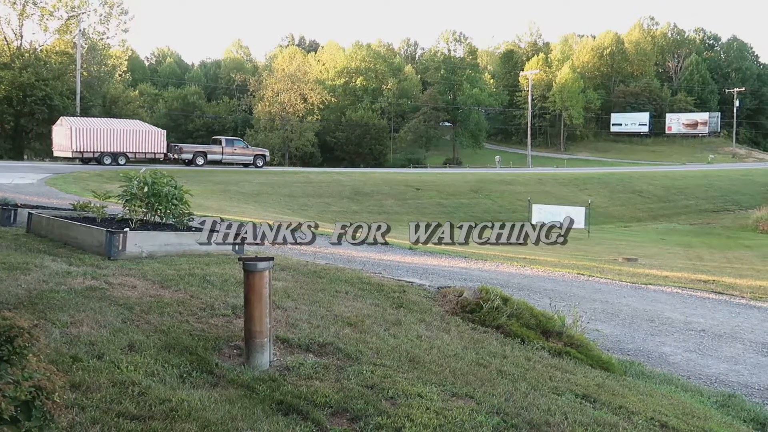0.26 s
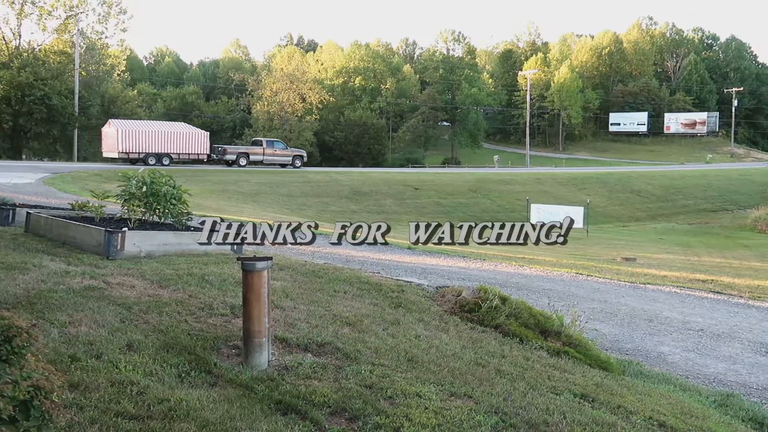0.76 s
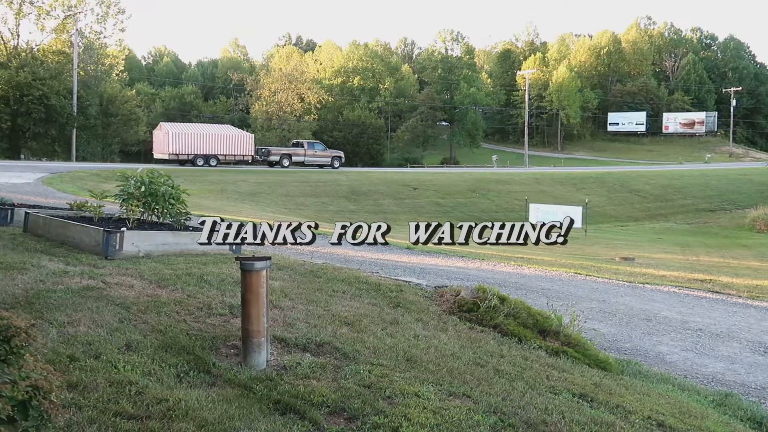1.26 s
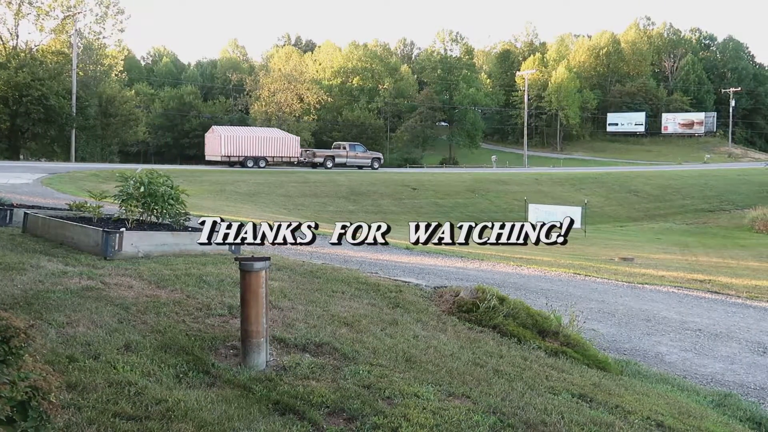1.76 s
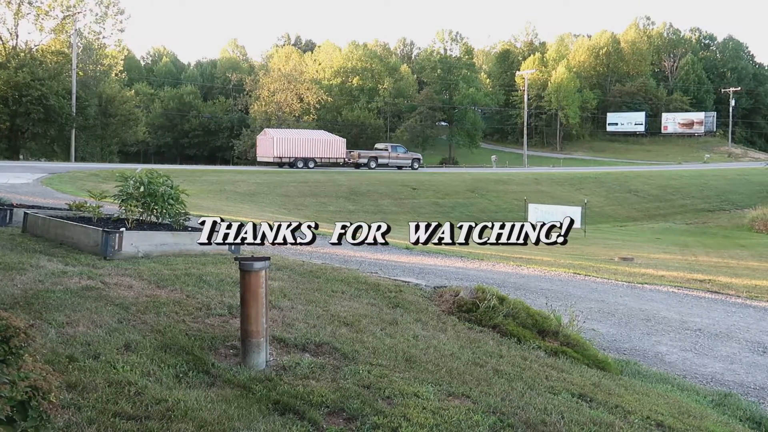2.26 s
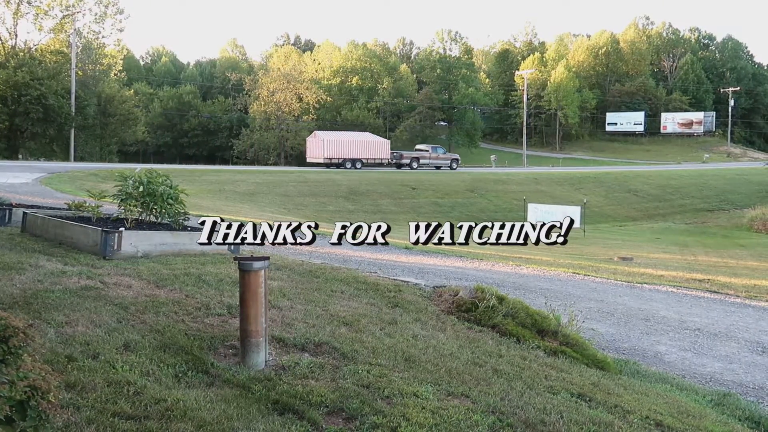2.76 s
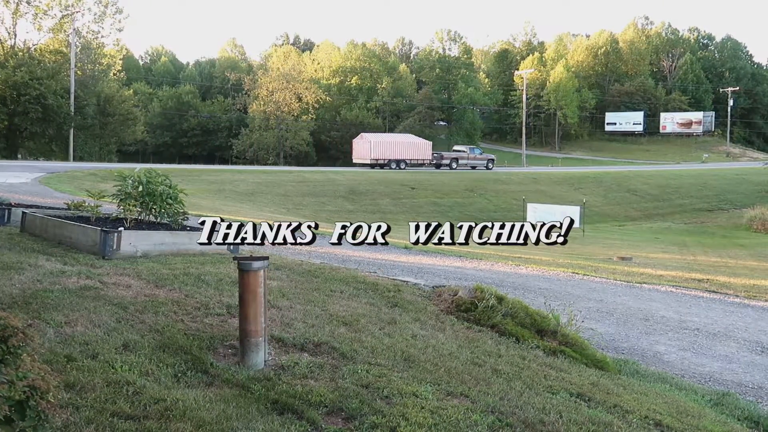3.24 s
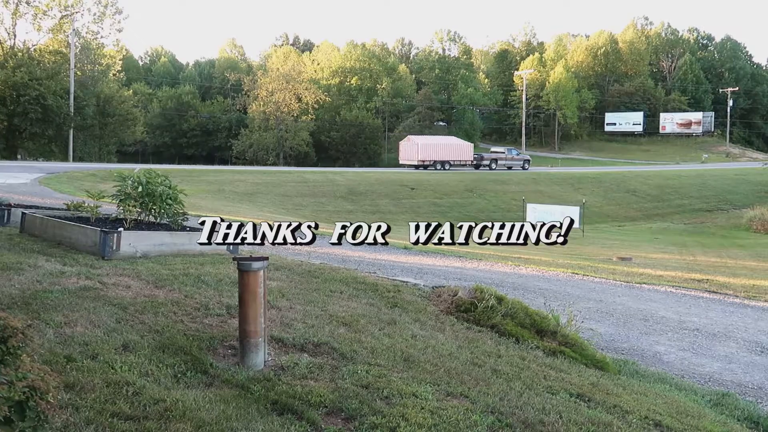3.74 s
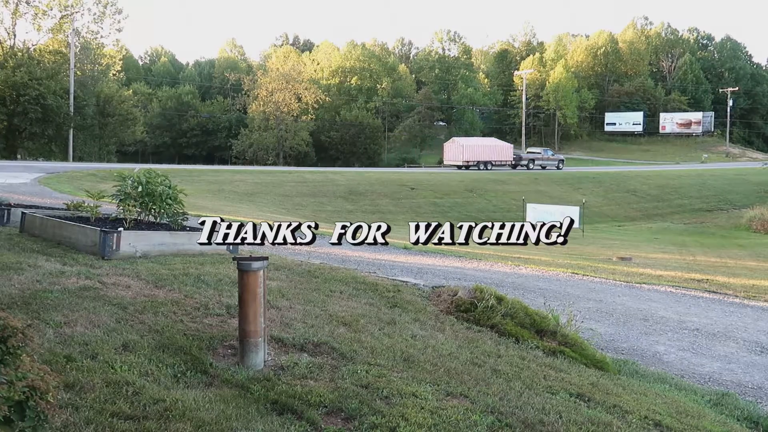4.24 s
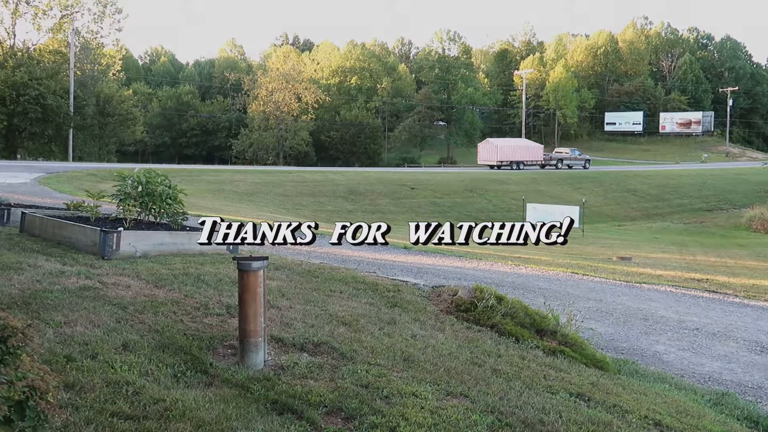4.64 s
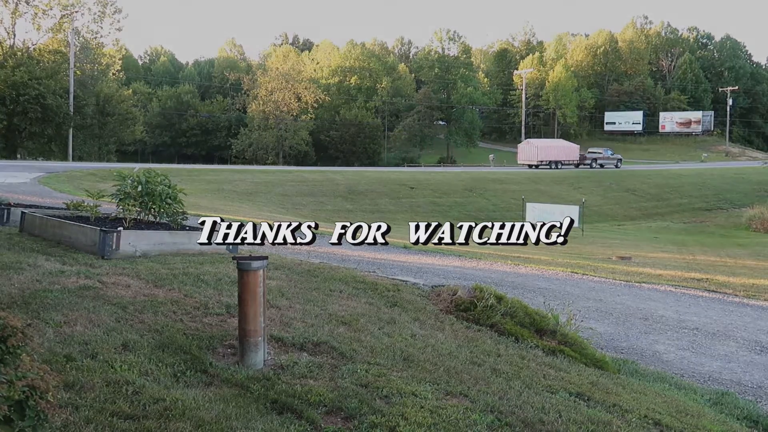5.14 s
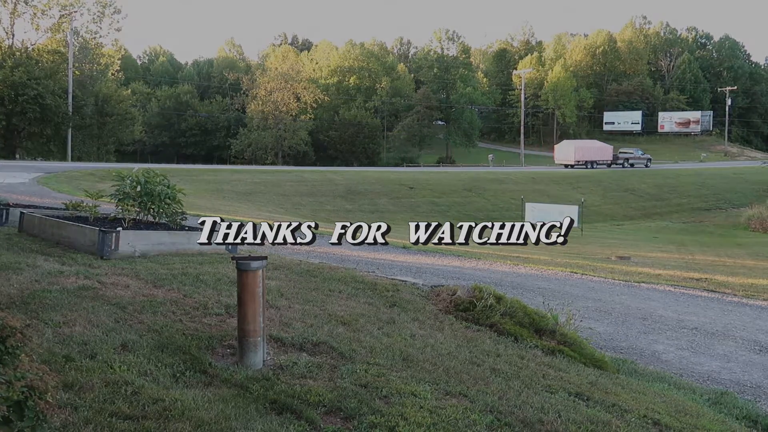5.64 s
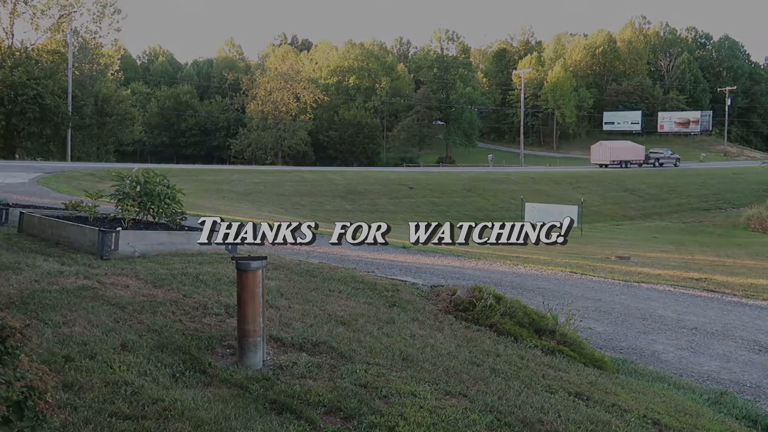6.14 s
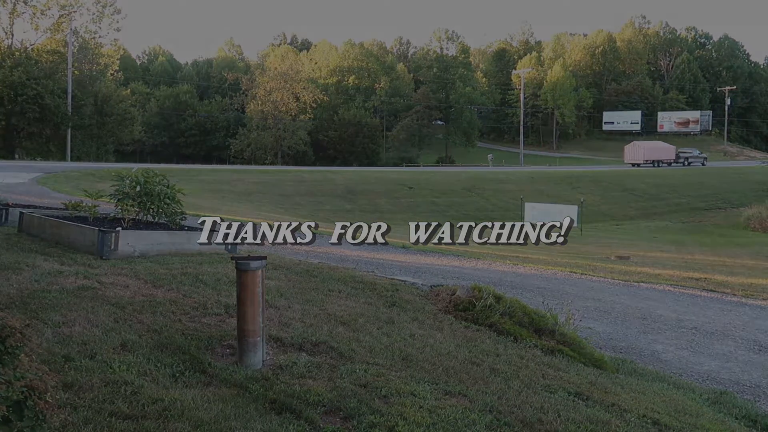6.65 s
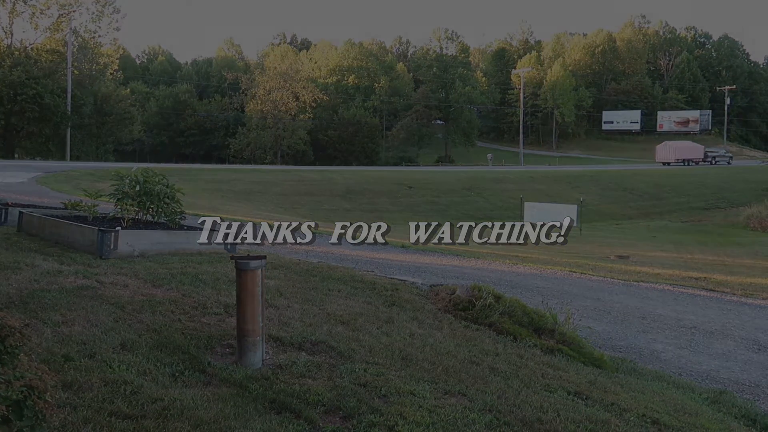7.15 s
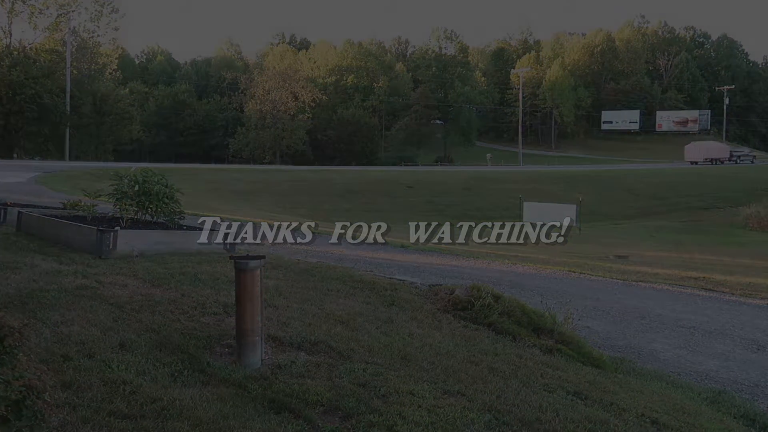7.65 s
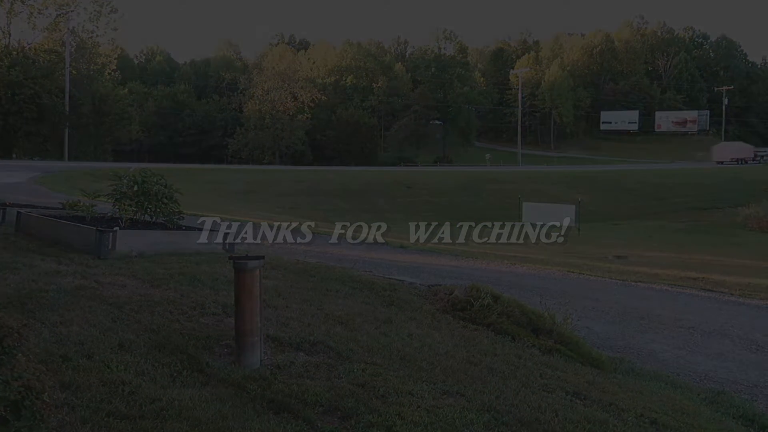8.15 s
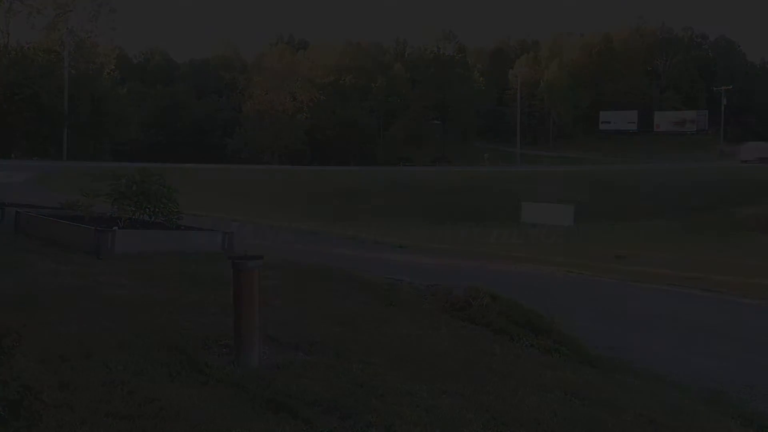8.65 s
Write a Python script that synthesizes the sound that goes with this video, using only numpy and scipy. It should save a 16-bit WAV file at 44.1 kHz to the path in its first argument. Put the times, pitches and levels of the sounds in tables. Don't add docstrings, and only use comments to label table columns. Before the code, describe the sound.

A diesel pickup towing a trailer is already pulling along a country road, heard from a grassy yard by a fixed stereo microphone. From 0 to 3 seconds its deep, even exhaust boom, around 80 hertz, climbs slightly, with a coarse, hollow knocking rattle and wavering pipe tones above and tyre and trailer rumble below. Around 3 seconds it shifts gear: the pitch drops quickly, holds low until about 4, climbs again by 5, then creeps up slowly. The boom flutters and thins at moments, and the rattle turns darker as the truck shows its rear. Soft hiss of leaves and field swells near 1, 4 and 6.5 seconds. A faint rustle comes at 3.4, a crisp close snap at 5.2, a barely audible tick at 8.6. From 4.7 everything distant fades steadily, almost silent by 9.

```python
import sys
import numpy as np
from scipy import signal
from scipy.io import wavfile
from scipy.ndimage import uniform_filter1d, map_coordinates

SR = 44100
rng = np.random.default_rng(int(sys.argv[2]) if len(sys.argv) > 2 else 0)


def pcm_store(signal):
    levels = np.round(np.clip(np.atleast_2d(signal), -1, 1) * 32767)
    wavfile.write(sys.argv[1], SR, levels.astype(np.int16).T)


def decibels_to_gain(level_db):
    exponent = np.asarray(level_db, float) / 20
    return 10 ** exponent


N = 392490
TIME = np.arange(N) / SR
SLOW_TIME = TIME[::256]
FFT_SIZE = 2048
HZ = np.fft.rfftfreq(FFT_SIZE, 1 / SR)

# time_s, firing_rate_hz
SPEED = [(0, 78.42), (.8, 78.83), (1.6, 82.18), (2.2, 85.4), (2.65, 88.6), (2.98, 88.68), (3.18, 82.24),
         (3.35, 81.3), (3.9, 81.67), (4.15, 82.23), (4.9, 88.33), (5.3, 89.87), (6.2, 89.63), (6.8, 91.36),
         (7.3, 92.15), (8.1, 93.5), (8.9, 93.9)]
# time_s, view (0 side, 1 rear quarter, 2 behind)
HEADING = [
    (0, 0),
    (1.6, 0.18),
    (2.6, 0.57),
    (4.2, 1.43),
    (5.4, 1.5),
    (8.9, 3.3),
]


def evened(x):
    return x / np.sqrt(np.mean(x ** 2) + 1e-20)


def curve(rows, t, axis=1):
    return np.interp(t, np.array(rows)[:, 0], np.array(rows)[:, axis])


def colour(rows, axis=1):
    rows = np.array(rows)
    return np.interp(np.log(HZ + 1), np.log(rows[:, 0] + 1), rows[:, axis])[:, None]


def bump(t, middle, half):
    return np.exp(-((t - middle) / half) ** 2)


def swells(rows):
    return sum(db * bump(TIME, middle_s, half_s) for middle_s, half_s, db in rows)


def wander(per_s):
    coarse = TIME[::64]
    knots = rng.standard_normal(400)
    return np.interp(TIME, coarse, map_coordinates(knots, [coarse * per_s + 2], order=3))


def shaped(x, gain):
    overlap = FFT_SIZE - 512
    _, t, z = signal.stft(x, SR, nperseg=FFT_SIZE, noverlap=overlap)
    return signal.istft(z * gain(t), SR, nperseg=FFT_SIZE, noverlap=overlap)[1][..., :N]


def patches(t, db, bins, frames):
    spots = rng.standard_normal((len(HZ), len(t)))
    spots = uniform_filter1d(uniform_filter1d(spots, bins, 0), frames, 1)
    return decibels_to_gain(db * evened(spots))


def ports(x, other, gain):
    # freq_hz, pan_db, pan_db, right_phase_rad, right_phase_rad, likeness, likeness
    port_rows = [(350, 0, -.1, -.1, 0, .982, .982), (850, 1.6, .5, -.1, 0, .985, .98),
                 (1200, 2.5, -.2, -.1, 0, .985, .97), (1600, .3, -2.9, 0, .3, .98, .76),
                 (2200, 0, -1.5, 0, .25, .98, .77), (2900, .7, -2.3, -.1, .5, .96, .8),
                 (3600, 1, -1.6, -.2, .6, .9, .72), (4500, .6, -.2, -.1, .1, .82, .68),
                 (5500, 2.1, .3, -1.5, 0, .8, .68), (6500, 1.2, -.7, -1, .6, .72, .62),
                 (7700, 1, -.7, -1.9, 1.6, .6, .42), (9500, .3, .2, -2.4, 0, .55, .2)]

    def moving(axis, t):
        start, end = colour(port_rows, axis), colour(port_rows, axis + 1)
        return start + t / t[-1] * (end - start)

    def pair(t):
        pan_db, turn_rad, same = moving(1, t), moving(3, t), moving(5, t)
        right = decibels_to_gain(-pan_db / 2)
        alike = right * same * np.exp(1j * turn_rad)
        return gain(t) * np.array([1 / right, alike, right * np.sqrt(1 - same ** 2)])

    left, alike, unlike = shaped(np.array([x, x, other]), pair)
    return evened(np.array([left, alike + unlike]))


def field():
    # freq_hz, density_db_per_hz
    hiss_rows = [(200, 3.5), (1000, -1.5), (2500, 2), (3600, -2.5), (4600, -4), (5500, -2.5), (6800, -9),
                 (8500, -16.5), (11000, -25.5), (12500, -53.5), (14500, -61.5)]
    # middle_s, half_length_s, level_db
    gusts = [
        (.9, .45, 3),
        (4.2, .3, 1.2),
        (6.5, 0.51, 2.5),
        (8.2, .5, 2),
    ]
    hiss = ports(*rng.standard_normal((2, N)), lambda t: decibels_to_gain(colour(hiss_rows)) * patches(t, 1.4, 20, 8))
    level_db = -42 - 0.28 * TIME + swells(gusts) + 0.49 * wander(2.5)
    return decibels_to_gain(level_db) * hiss


def ticks():
    # start_s, peak_db, centre_hz, length_ms, pan_db
    tick_rows = [
        (3.395, -51, 9150, 14, 7),
        (5.187, -45, 9070, 0.83, -1),
        (5.187, -30, 5020, 1.6, 4.5),
        (8.609, -59, 5038, 1.2, 10),
    ]
    out, t = np.zeros((2, N)), np.arange(2000) / SR
    for start_s, db, hz, ms, pan_db in tick_rows:
        length_s = ms / 1000
        snap = rng.standard_normal((2, len(t))) * bump(t, 2 * length_s, length_s)
        snap = signal.lfilter(*signal.butter(2, [hz * 0.47, hz * 1.2], "band", fs=SR), snap)
        at = round((start_s - 2 * length_s) * SR)
        out[:, at:at + len(t)] += 2 * snap * decibels_to_gain([[db + pan_db / 2], [db - pan_db / 2]])
    return out


def rumble(knock_db):
    # freq_hz, density_db_per_hz
    rumble_rows = [(15, -7), (30, 15.5), (50, 9), (75, 22), (110, 20.5), (160, 19.5), (220, 12.5), (300, 4),
                   (500, -37)]
    a, b = rng.standard_normal((2, N))
    both = np.array([a + 0.085 * b, a - 0.094 * b])
    low = shaped(both, lambda t: decibels_to_gain(colour(rumble_rows)) * patches(t, 1.0, 3, 15))
    return decibels_to_gain(knock_db - 1.5) * evened(low)


def body(t):
    # centre_hz, width_hz, side_db, rear_quarter_db, behind_db
    resonances = [(360.5, 101, -8.5, -5, -4.5), (484, 41, -7, -5.5, -10.5), (606, 213, -11, -2.5, -3),
                  (759, 91, -14, -0.5, -4), (904, 200, -3, -9, -17.5), (1060, 130, -8.5, -3, -4),
                  (1172, 186, -3.5, -1.5, -4.5), (1443, 100, -5.5, -10, -20), (1570, 84, -4.5, -0.5, -17.5),
                  (1695, 54, -11.5, -18.5, -8), (1918, 44, -4, -25.5, -15), (2052, 66, -9, -8, -20),
                  (2250, 170, -14.5, -30, -12.5), (2468, 95, -9, -15, -17), (2773, 200, -11.5, -15.5, -15),
                  (2980, 170, -16.5, -14.5, -29.5), (3210, 130, -28, -46, -17),
                  (3480, 40, -21, -13.5, -26.5)]
    view = np.clip(curve(HEADING, t), 0, 2)
    power = 0
    for hz, width_hz, *view_db in resonances:
        peak = decibels_to_gain(2 * np.interp(view, (0, 1, 2), view_db))
        power = power + peak / (1 + (2 * (HZ[:, None] - hz) / width_hz) ** 2) ** 1.355
    return np.sqrt(power / power.mean(0)) * patches(t, 1.8, 6, 40)


def knock(cycles):
    steady, paired, depth = 0.72, 0.59, 0.2
    size = 3072
    place = (cycles % 1 * size).astype(int)
    own = rng.standard_normal((24, size))
    shared = np.tile(rng.standard_normal((24, size // 3)), 3)
    patterns = paired * shared + np.sqrt(1 - paired ** 2) * own
    step = TIME * 1.102
    old, mix = step.astype(int), np.pi / 2 * (step % 1)
    repeat = np.cos(mix) * patterns[old, place] + np.sin(mix) * patterns[old + 1, place]
    firing = cycles * 6
    strength = decibels_to_gain(2.0 * rng.standard_normal(6))[firing.astype(int) % 6]
    burst = 1 - depth + depth * strength * 3 * np.exp(-(firing % 1) / 0.69)
    return burst * (steady * repeat + np.sqrt(1 - steady ** 2) * rng.standard_normal(N))


def upper_orders(cycles):
    # cycle_multiple, centre_hz, width_hz, rms_db
    singing = [(15, 214.5, 11, -37.5), (18, 275, 9.2, -42.5), (30, 430, 22, -48), (36, 512.5, 21.5, -43),
               (42, 610, 20, -46), (57, 850, 13, -47), (69, 1030, 12, -45), (72.9, 1000, 8.5, -44.5),
               (78.2, 1200, 14, -43)]
    # middle_s, cycle_multiple, rms_db
    swell_rows = [(.4, 30, -47.5), (0.598, 69, -40.5), (.8, 79, -41.5), (1.25, 54, -46.5),
                  (1.49, 63, -44.5), (1.4, 69, -42.5), (1.9, 15, -40), (2.2, 36, -46), (2.7, 30, -48),
                  (2.7, 51, -45), (5.0, 51, -44), (5.2, 14, -34.5), (2.201, 44, -42.5), (2.5, 67, -43),
                  (3.7, 18, -42), (4.0, 87, -43.5), (4.1, 36, -52), (5.5, 24, -47.5)]
    rate_hz = curve(SPEED, SLOW_TIME) / 6
    upper = {}
    for multiple, hz, width_hz, db in singing:
        k = round(multiple)
        upper[k] = decibels_to_gain(db) * bump(k * rate_hz, hz, width_hz)
    facing = decibels_to_gain(-41) * bump(SLOW_TIME, 3.34, 1.3)
    for k in range(51, 58):
        upper[k] = upper.get(k, 0) + facing * bump(k * rate_hz, 762, 16)
    for middle_s, multiple, db in swell_rows:
        k = round(multiple)
        upper[k] = upper.get(k, 0) + decibels_to_gain(db) * bump(SLOW_TIME, middle_s, 0.42)
    blur_turns, waver = 0.075 * wander(6), decibels_to_gain(1.5 * wander(7))
    out = np.zeros(N)
    for k, level in upper.items():
        phase_turns = k * cycles + blur_turns + rng.random()
        out += waver * np.interp(TIME, SLOW_TIME, level) * np.cos(2 * np.pi * phase_turns)
    return out


def weak_orders(cycles, knock_db):
    # cycle_multiple, level_re_knock_db
    weak = [(3, -16.5), (4, -17), (9, -7), (14, -14.5), (15, -16), (17, -19.5), (18, -22), (20, -26.5),
            (24, -28.5), (26, -32.5)]
    out = np.zeros(N)
    for multiple, db in weak:
        level = decibels_to_gain(knock_db + db + wander(2.2))
        out += level * np.cos(2 * np.pi * multiple * cycles + 1.53 * wander(2.4))
    return out


def strong_orders(cycles):
    # cycle_multiple, side_db, behind_db, waver_db
    strong = [(6, -10.5, -9.5, 0.65), (8, -31.5, -26.5, 2.1), (10, -29.5, -39.5, 2),
              (12, -23.5, -27.5, 1.6)]
    # middle_s, half_length_s, cycle_multiple, depth_db
    dips = [(.85, 0.43, 6, -2), (1.613, 0.3, 6, -5.5), (2.53, 0.23, 6, -3.5), (3.158, 0.09, 6, -6.5),
            (3.866, 0.38, 6, -7.5), (4.62, 0.29, 6, -5), (6.42, .18, 6, -5), (6.75, .2, 6, -9),
            (7.05, 0.13, 6, -3.5), (7.53, 0.44, 6, -5.5), (8.05, .15, 6, -3), (8.43, 0.49, 6, -8.5),
            (8.95, 0.26, 6, -13), (1.28, .4, 12, -15.5), (0.75, 0.36, 12, -5.5), (1.9, 0.24, 12, -4),
            (3.9, .15, 12, -5), (2.2, 0.19, 12, -3.5), (2.78, 0.11, 12, -11), (3.55, .17, 12, -15),
            (3.25, .15, 12, -4.5), (4.15, 0.1, 12, -5), (5.28, 0.13, 12, -8.5), (6.4, .45, 12, -6),
            (2.6, 0.57, 8, -4.5), (4.6, .2, 8, -7.5), (7.5, 0.55, 8, -4.5), (.3, 0.44, 10, -3),
            (2.75, .3, 10, -9.5)]
    behind = np.clip(curve(HEADING, SLOW_TIME) / 2, 0, 1)
    out = np.zeros(N)
    for k, side_db, behind_db, waver_db in strong:
        db = side_db + behind * (behind_db - side_db)
        for middle_s, half_s, multiple, dip_db in dips:
            if multiple == k:
                db = db + dip_db * bump(SLOW_TIME, middle_s, half_s)
        drift_rad = 0.061 * wander(9.1) if k == 6 else 0.38 * wander(1.8)
        level = decibels_to_gain(np.interp(TIME, SLOW_TIME, db) + waver_db * wander(7))
        out += level * np.cos(2 * np.pi * k * cycles + drift_rad)
    return out


def exhaust(cycles, knock_db):
    return np.sqrt(2) * (strong_orders(cycles) + weak_orders(cycles, knock_db) + upper_orders(cycles))


def scene():
    # middle_s, half_length_s, level_db
    pulls = [
        (.8, .3, 0.65),
        (2.7, .5, 1),
        (4.55, 0.36, -1.5),
        (5.1, 0.28, 0.5),
        (7.0, 0.36, 1),
        (8.7, .3, 0.5),
    ]
    speed_hz = uniform_filter1d(curve(SPEED, TIME), size=3000, mode="nearest")
    cycles = np.cumsum(speed_hz) / SR / 6 + .9
    knock_db = -28.5 - 0.24 * TIME + swells(pulls) + 0.31 * wander(4.7)
    rattle = decibels_to_gain(knock_db - 0.81) * ports(knock(cycles), rng.standard_normal(N), body)
    boom = exhaust(cycles, knock_db) * decibels_to_gain([[-.12], [.12]])
    far = boom + rattle + rumble(knock_db) + field()
    fade_start_s, fade_end_s = 4.71, 9.143
    fade = np.clip((fade_end_s - TIME) / (fade_end_s - fade_start_s), 0, 1)
    return fade * far + ticks()


def dropouts(t):
    # freq_hz, sum_threshold, difference_threshold
    holes = [(200, 4.0, 1.3), (600, 4.0, .2), (1100, 4.0, 1.4), (2200, 4.0, 1.5), (4000, 2.5, 2.2),
             (7000, 1.1, 2.6), (10000, .6, 1.4), (12200, -.6, -.3), (14000, -.1, 0)]
    luck = rng.standard_normal((2, len(HZ) // 7 + 1, len(t) // 3 + 1))
    short = evened(uniform_filter1d(rng.standard_normal(luck.shape[2]), size=3))
    luck = .85 * luck + .5 * np.clip(short, -1.5, 1.3)
    luck = luck.repeat(7, axis=1).repeat(3, axis=2)[:, :len(HZ), :len(t)]
    over = luck - np.array([colour(holes), colour(holes, axis=2)])
    return decibels_to_gain(-22 * np.clip(4 * over, 0, 1))


def roll_off(x):
    return signal.sosfilt(signal.butter(12, 14900, fs=SR, output="sos"), x)


def record(dry):
    left, right = dry
    mid, side = shaped(np.array([left + right, left - right]) / 2, dropouts)
    return roll_off(np.array([mid + side, mid - side]))


dry = scene()
out = record(dry)
pcm_store(out)
```